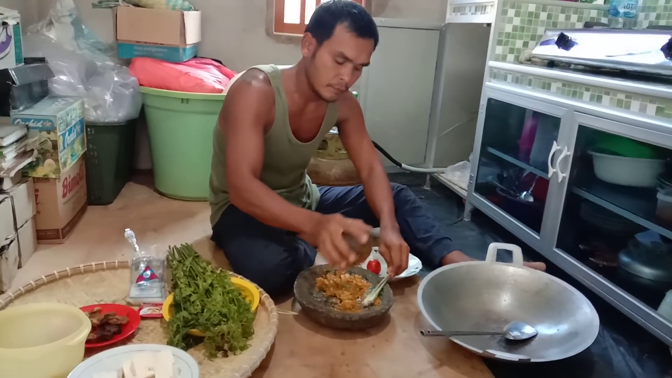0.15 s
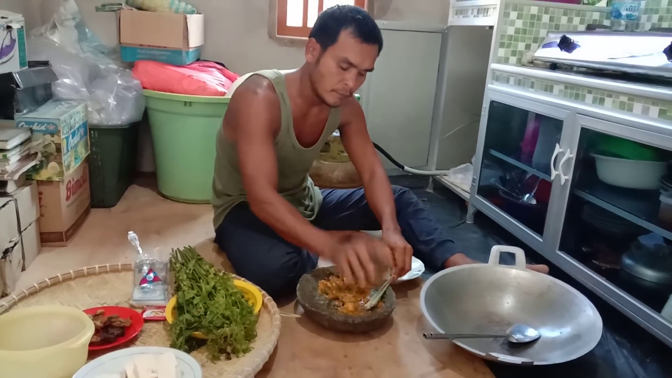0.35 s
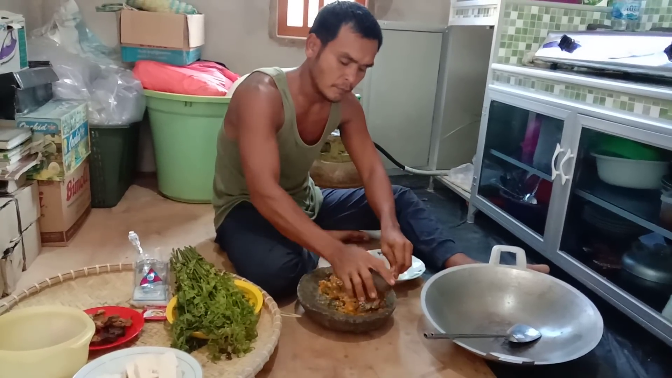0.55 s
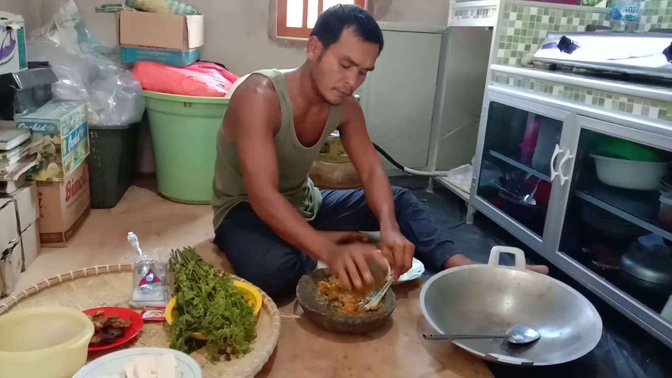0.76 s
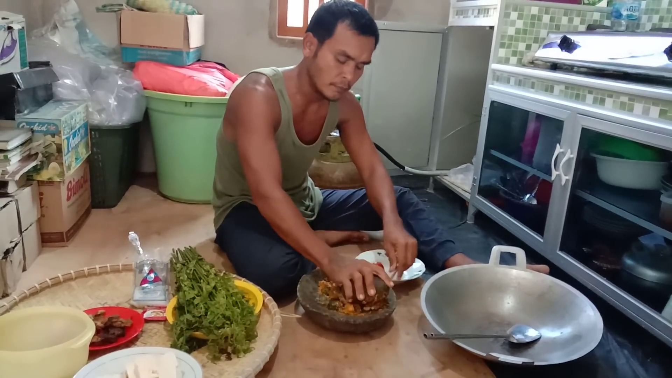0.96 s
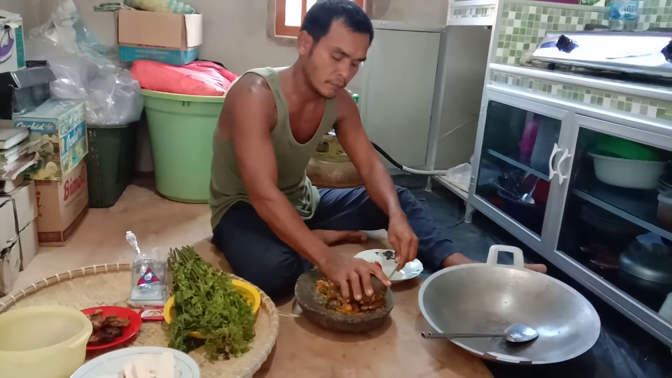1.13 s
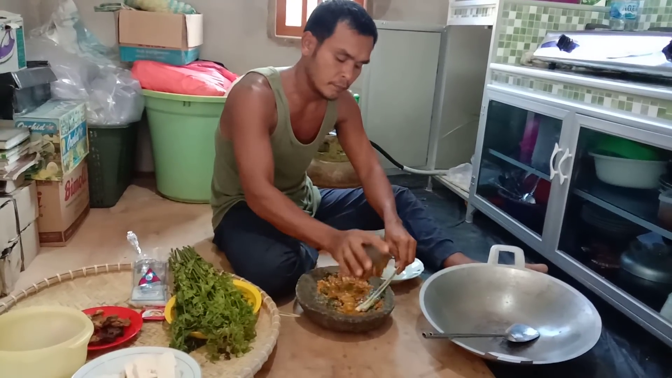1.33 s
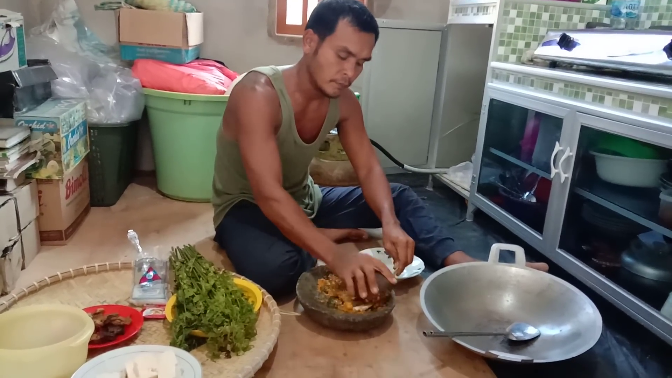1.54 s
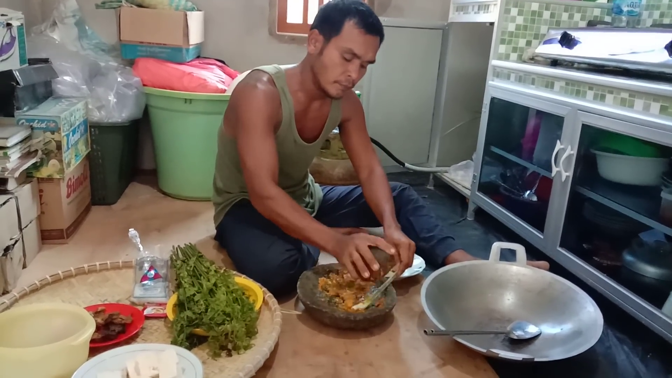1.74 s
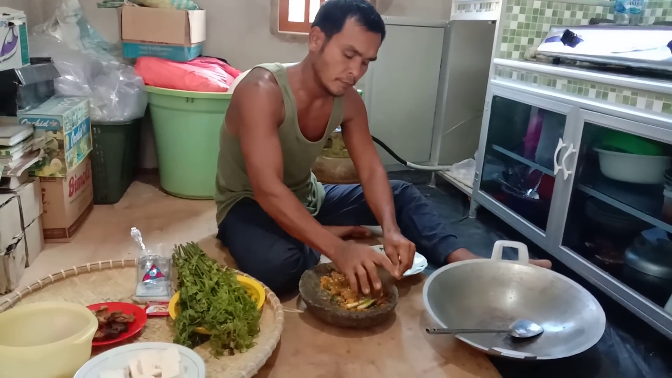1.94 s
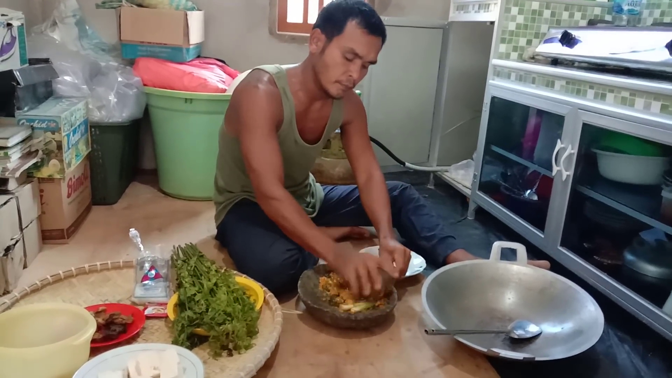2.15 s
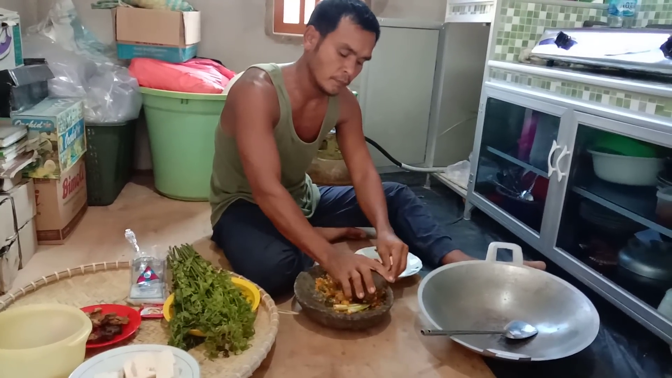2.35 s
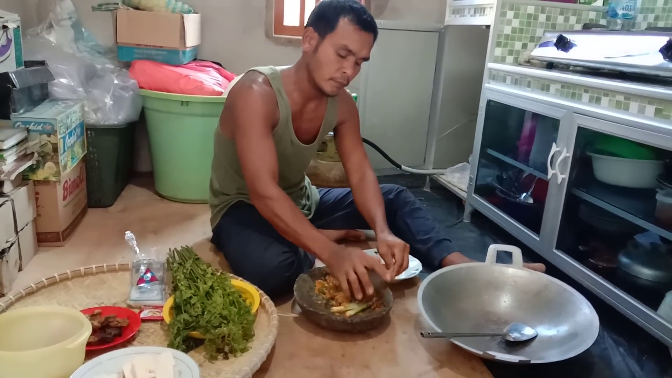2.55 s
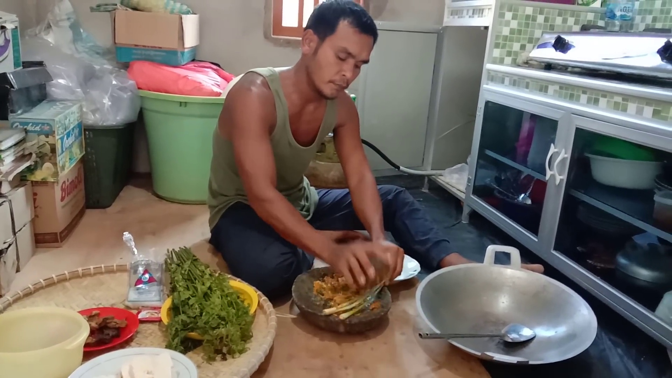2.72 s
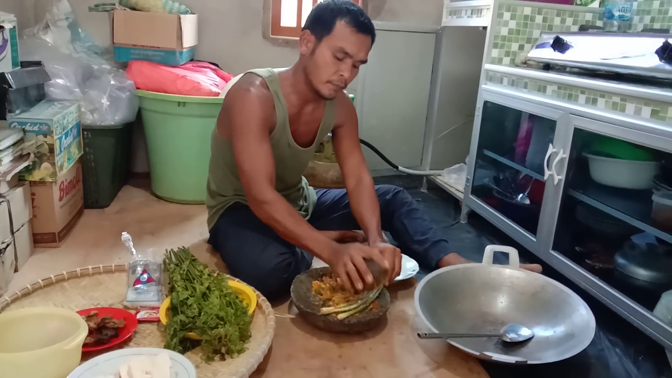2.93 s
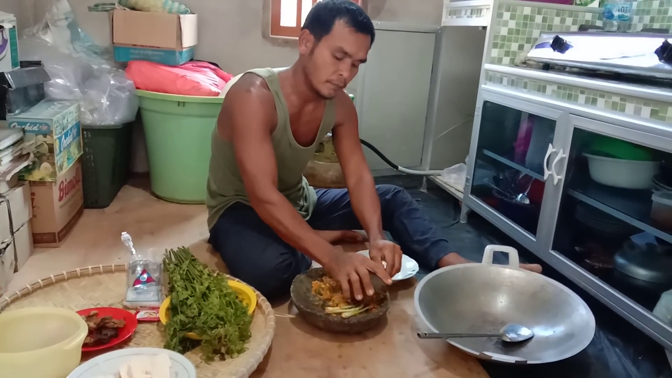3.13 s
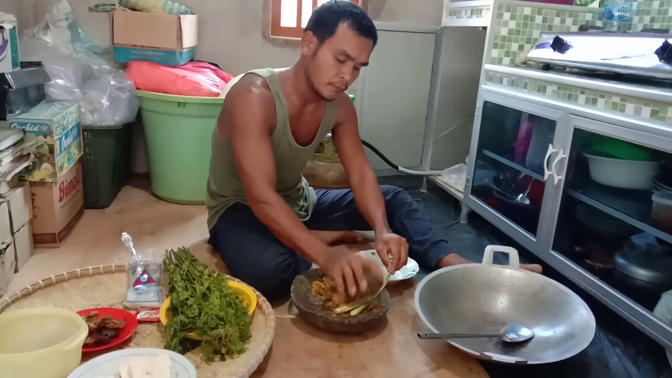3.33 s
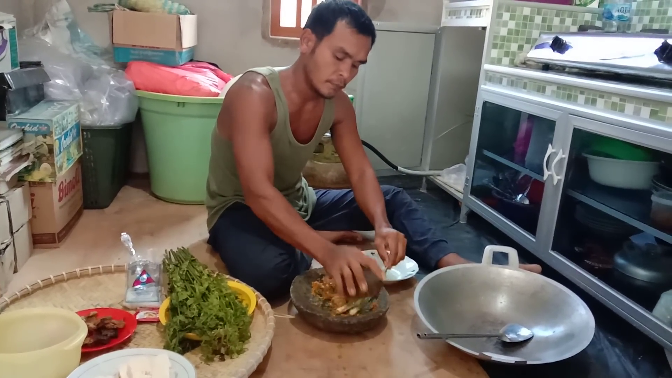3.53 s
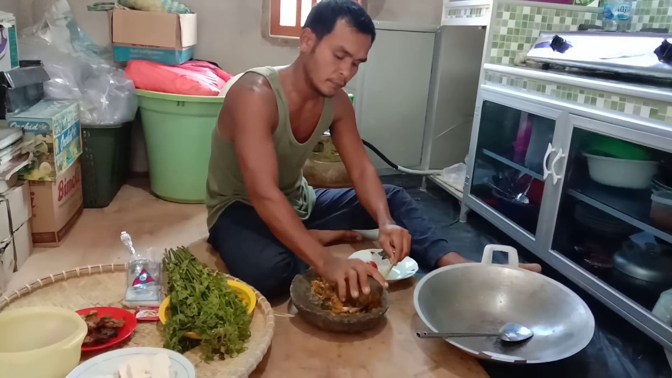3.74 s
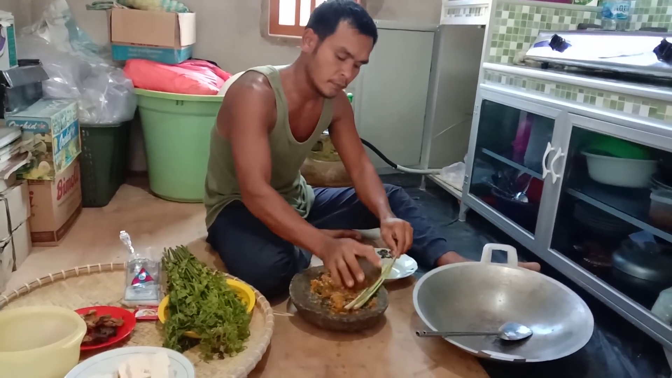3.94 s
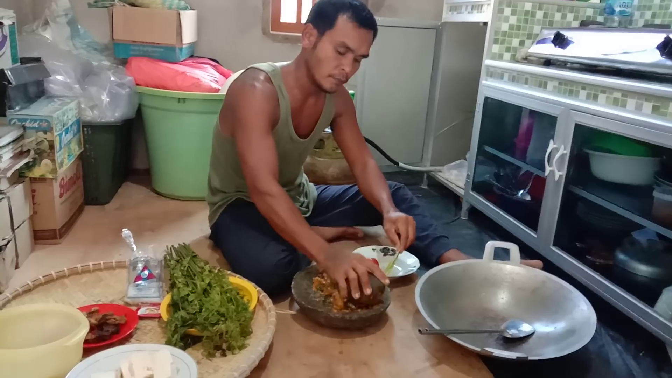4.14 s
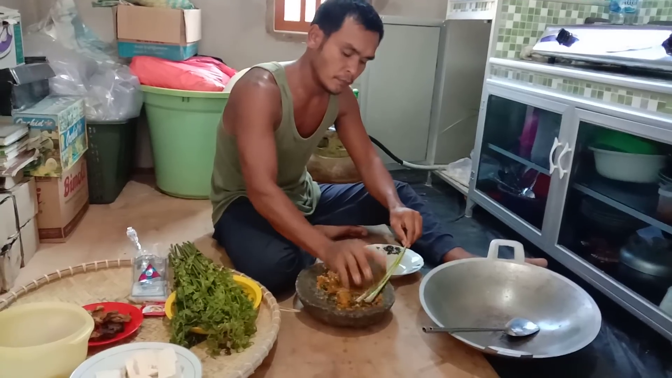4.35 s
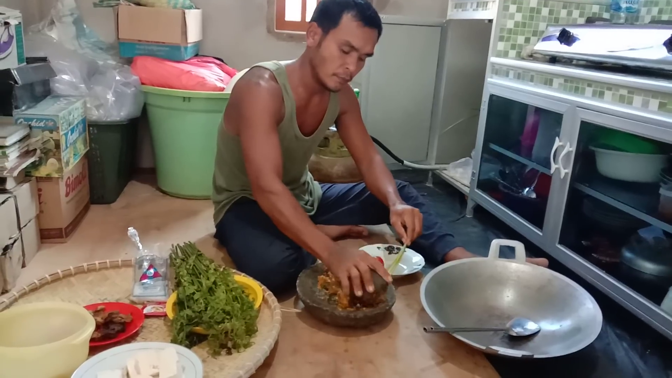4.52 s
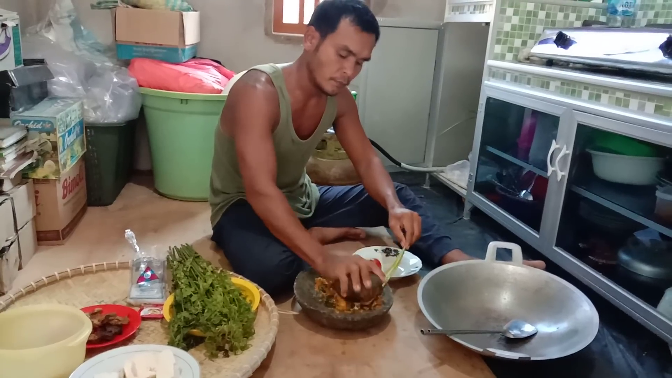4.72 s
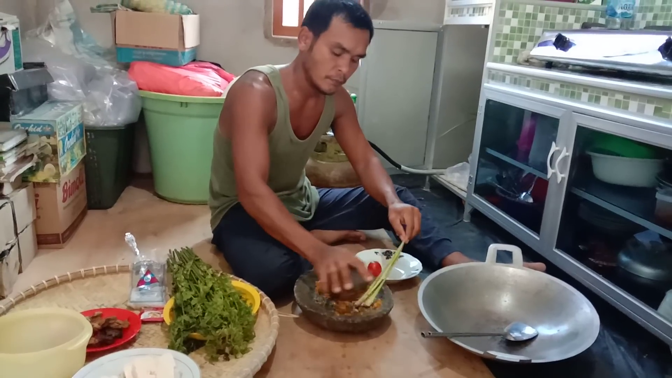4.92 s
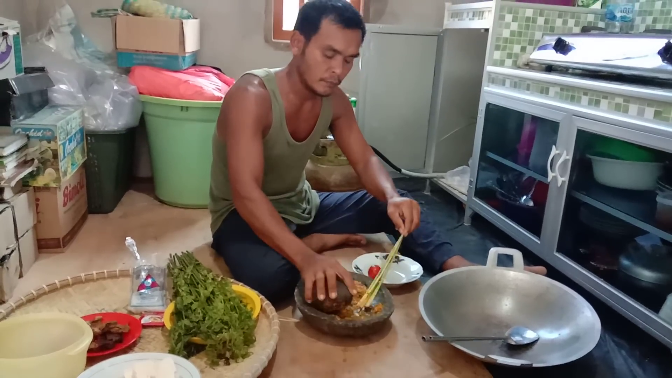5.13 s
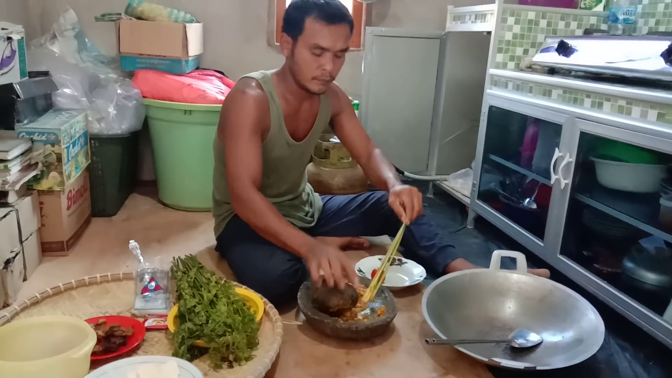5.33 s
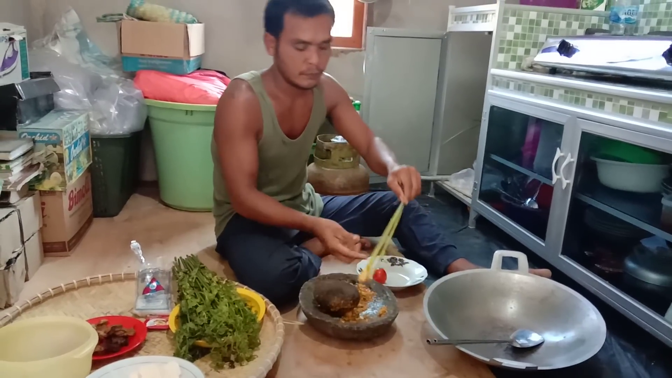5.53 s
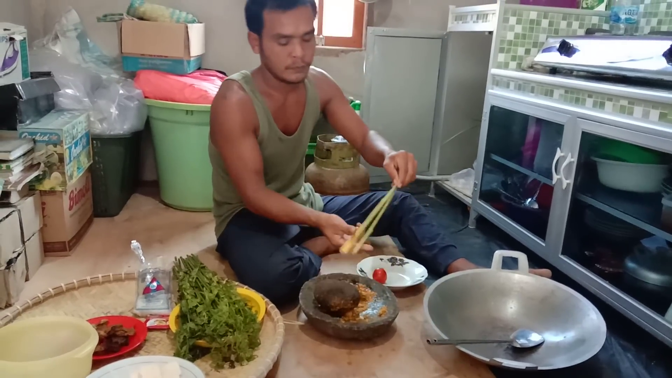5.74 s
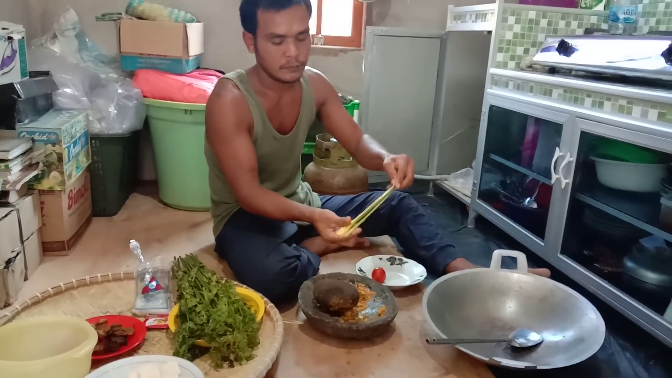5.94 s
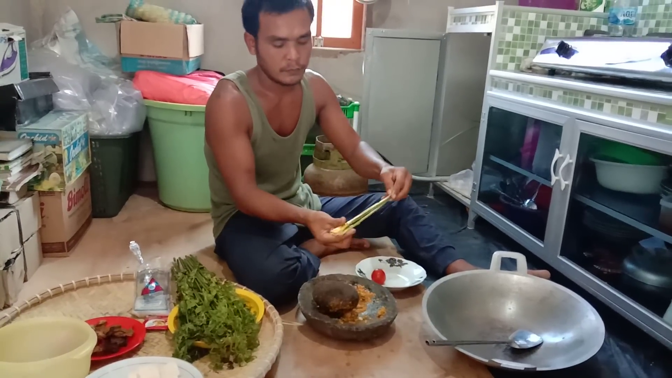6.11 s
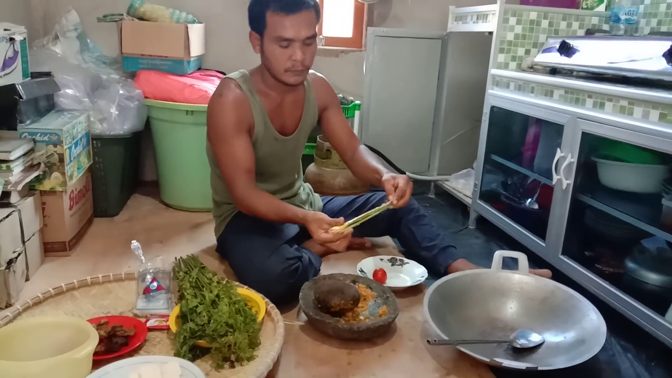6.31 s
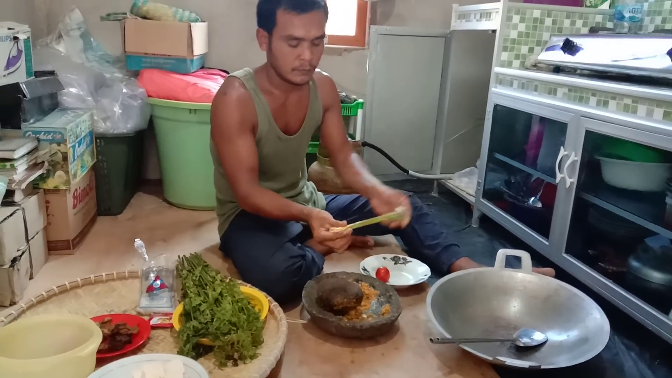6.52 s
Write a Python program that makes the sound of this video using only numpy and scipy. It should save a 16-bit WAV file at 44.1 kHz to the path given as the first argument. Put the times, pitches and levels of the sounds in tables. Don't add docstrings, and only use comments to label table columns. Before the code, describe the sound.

A faint ringing tail from an earlier blow fades at the start. At 0.37 s a stone pestle crunches into paste in a stone mortar, with a quick rebound, low floor thump and lively kitchen reverberation. Blows follow at 0.78, 1.43, 1.8, 2.13 and 2.74 s, with bounces, crackling stalks, tiny fibre snaps and shuffles; the last has sharp double rebounds and a wet hiss. At 3.04 s the pestle strikes bare stone, a hard ringing clack with diminishing chatter to 3.2. Steadier damped knocks land at 3.36, 3.69, 4.05, 4.39 and 4.71 s; a distant bird chirps near 4.25. At 5.06 s the pestle is laid down in a tight, hollow cluster of knocks. Quiet room tone remains, with a bright rustling tug around 5.7, faint bird chirps near 5.56 and 6.3, and a scratchy slide swelling at 6.67 s. Close phone microphone, loud hits compressed.

```python
import sys
import numpy as np
from scipy import signal
from scipy.fft import rfft, irfft
from scipy.io import wavfile
from scipy.ndimage import uniform_filter1d

SR = 44100
rng = np.random.default_rng(int(sys.argv[2]) if len(sys.argv) > 2 else 0)


def elevation(decibels):
    levels = np.asarray(decibels, float)
    return 10 ** (levels / 20)


def to_wav(s):
    ch = np.atleast_2d(s).T
    pcm = np.round(np.clip(ch, -1, 1) * 32767)
    wavfile.write(sys.argv[1], SR, pcm.astype(np.int16))


N = 294265


def at_hz(points, hz):
    table = np.array(points)
    return np.interp(np.log(hz + 1), np.log(table[:, 0]), table[:, 1])


def band(x, low_hz, high_hz, order=2):
    return signal.sosfilt(signal.butter(order, [low_hz, high_hz], "band", fs=SR, output="sos"), x)


def colour(x, points, peaks=()):
    hz = np.linspace(0, SR / 2, 4097)
    db = at_hz(points, hz)
    for f, width, top_db in peaks:
        db = db + top_db / (1 + (2 * (hz - f) / width) ** 2)
    cepstrum = irfft(db * np.log(10) / 20)
    cepstrum[1:4096] *= 2
    cepstrum[4097:] = 0
    return signal.oaconvolve(x, irfft(np.exp(rfft(cepstrum))))[:N]


def ring(x, hz, t60):
    r = elevation(-60 / (t60 * SR))
    w = 2 * np.pi * hz / SR
    return signal.lfilter([0, np.sin(w)], [1, -2 * r * np.cos(w), r * r], x + 1e-18)


def drift(rate):
    r = np.exp(-2 * np.pi * rate / SR)
    slow = signal.lfilter([1], [1, -2 * r, r * r], rng.standard_normal(N + SR))[SR:]
    return slow / slow.std()


COLOUR_HZ = (170, 520, 1300, 2700, 6000)


def tilt(row, hz, top_db):
    s, knock_db, thud, body, splash = row
    crack = -8 + 0.49 * splash
    levels = (thud, body, 0, crack, splash, splash + top_db)
    return knock_db + at_hz(list(zip(COLOUR_HZ + (14000,), levels)), hz)


def crush(rise_s, fall_s, lead_db):
    t = np.arange(-600, 1800) / SR
    shape = np.where(t > 0, (1 - np.exp(-t / rise_s)) * np.exp(-t / fall_s), 0)
    shape = shape / shape.max() + elevation(lead_db) * np.exp(-np.abs(t) / 0.014)
    roughness = elevation(0.59 * rng.standard_normal(len(t)))
    return shape * rng.standard_normal((2, len(t))) * roughness


def contacts(rows, rise_s, fall_s, lead_db, top_db):
    out = np.zeros(N + 2400)
    edges = 50 * 2.0 ** np.arange(0, 8.5, .7)
    grits = np.array([crush(rise_s, fall_s, lead_db) for row in rows])
    for k, (low, high) in enumerate(zip(edges, edges[1:])):
        hz = np.sqrt(low * high)
        direct_db = -1.1 * max(np.log2(hz / 1500), 0)
        for row, part in zip(rows, band(grits[:, k % 2], low, high)):
            i = round(row[0] * SR)
            level = elevation(tilt(row, hz, top_db) + direct_db)
            out[i:i + len(part)] += part / np.abs(part).max() * level
    return out[600:N + 600]


# (time [s], knock level [dB], thud, body and splash [dB against the knock])
BLOWS = [(0.3663, -12, -14.5, -3, 3), (0.778, -11.5, -17, -5, -4.5), (1.4304, -14, -13.5, -1.5, 2),
         (1.7955, -21.5, -14, 0.5, 10), (2.125, -26, -6, 3, 15), (2.7363, -24, -16.5, -3, 7.5),
         (3.3645, -15.5, -16, -9.5, -1.5), (3.6908, -13, -13, -7, -2.5), (4.0466, -16.5, -13.5, -7, -2.5),
         (4.3868, -15, -13, -7, -3), (4.7097, -17.5, -10.5, -4, -1)]


def push():
    push_s, push_db = 0.0022, -1.5
    out = np.zeros(N)
    shape = np.sin(2 * np.pi * np.arange(0, 1, 1 / (2 * push_s * SR)))
    for s, knock_db, thud, body, splash in BLOWS:
        i = round(s * SR)
        out[i:i + len(shape)] = elevation(knock_db + body + push_db) * shape
    return out


# (frequency [Hz], level [dB], t60 [s])
RINGS = [(92, -35.5, 0.94), (149.1, -20.5, 0.69), (222.2, -19, 0.35), (249.4, -18, 0.31),
         (307, -28.5, 0.24), (374.5, -16.5, 0.12), (558, -28.5, 0.27), (628, -24, 0.62), (842, -30, .3),
         (770, -32.5, 0.35), (1226, -33.5, 0.8), (1238, -35.5, 0.73)]


def rings(hits):
    return sum(elevation(db - 32.0) * ring(hits, hz, t60) for hz, db, t60 in RINGS)


# (delay [s], level [dB])
ECHOES = [(0.009, -24), (.027, -11)]


def echoes(x):
    return sum(elevation(db) * np.roll(x, round(lag_s * SR)) for lag_s, db in ECHOES)


# (frequency [Hz], t60 [s])
KITCHEN_T60 = [(70, 0.46), (200, 0.57), (600, 0.5), (1300, 0.46), (2700, 0.41), (6000, 0.36), (11000, 0.15),
               (15000, 0.23)]
# (frequency [Hz], level [dB])
KITCHEN = [(60, -8), (150, 6.5), (500, 1), (1300, -4.5), (2700, 0.5), (6000, -5.5), (11000, -2),
           (16000, 0.5)]


def kitchen(times, level_db, build_s, linger):
    white = rng.standard_normal((2, N))
    edges = 32 * 2.0 ** np.arange(0, 9.2, .5)
    out = np.zeros(N)
    quick = np.exp(-1 / (build_s * SR))
    patches = [elevation(2.0 * drift(16.0)) for k in range(3)]
    struck_at = np.round(np.array(times) * SR).astype(int)
    for k, (low, high) in enumerate(zip(edges, edges[1:])):
        hz = np.sqrt(low * high)
        struck = np.full(N, 1e-18)
        struck[struck_at] = elevation(2 * level_db(hz))
        near, far = np.roll(struck, round(0.011 * SR)), np.roll(struck, round(0.019 * SR))
        struck = 0.29 * struck + 0.2 * near + 0.35 * far
        slow = elevation(-120 / (linger * at_hz(KITCHEN_T60, hz) * SR))
        energy = signal.lfilter([1 - quick], np.convolve([1, -quick], [1, -slow]), struck)
        noise = band(white[k % 2], low, high)
        out += noise / noise.std() * np.sqrt(energy) * patches[k % 3] * elevation(at_hz(KITCHEN, hz))
    return out


# (frequency [Hz], level [dB])
MICROPHONE = [(30, -28), (70, -10), (1050, -0.5), (1250, 1), (1650, -0.5), (2200, -0.5), (2500, 2.5),
              (5800, -4), (6600, -3), (7200, 3.5), (8300, -9), (12800, -25), (15000, -3.5), (16000, -17.5)]


def microphone(x):
    return colour(x, MICROPHONE)


# (time [s], knock level [dB], thud, body and splash [dB against the knock])
BOUNCES = [(0.4261, -12, -34, -8.5, 0), (0.4675, -21.5, -23, -2, -22.5), (0.8298, -18.5, -16.5, -14, -4),
           (1.5116, -16, -32, -38, -32), (1.8393, -10.5, -14.5, -11, -7), (2.1756, -9, -19.5, -11.5, -18),
           (2.2117, -20.5, -13, -7, -14), (2.158, -27, -19, -10, -3), (1.463, -27, -19, -12.5, 0),
           (2.82, -17.5, -22, -9, -6.5), (3.2, -24, -17, -8.5, -19), (2.757, -14.5, -16, -11, -4),
           (2.786, -7.5, -16, -13.5, -7.5)]
# (time [s], knock level [dB], splash [dB against the knock])
TICKS = [
    (1.113, -64.5, 26.5),
    (1.118, -58, 25.5),
    (2.112, -68.5, 30),
    (2.5207, -63, 31.5),
    (2.558, -65, 33),
    (3.625, -77.5, 26),
]


def pounding():
    ticks = [(s, db, 0, 0, splash) for s, db, splash in TICKS]
    blows = contacts(BLOWS, 0.0035, .004, -34.5, -10.5)
    bounces = elevation(-5.5) * contacts(list(BOUNCES) + ticks, 0.0003, 0.005, -55.0, -1.1)
    rows = list(BLOWS) + list(BOUNCES) + ticks
    wet_db = np.repeat([-12, -19, -13], [len(BLOWS), len(BOUNCES), len(TICKS)])

    def room_level(hz):
        return np.array([tilt(r, hz, -7.0) for r in rows]) + wet_db

    room = kitchen([r[0] for r in rows], room_level, 0.002, 1.232)
    direct = blows + push() + bounces + rings(blows) + echoes(blows)
    return microphone(elevation(5.0) * direct + room)


# (start [s], level [dB])
CRACKLE = [(0.3634, -20), (0.773, -26), (1.422, -30), (1.795, -21), (2.1227, -26), (2.731, -35),
           (3.357, -35), (3.68, -35.5), (4.0383, -28.5), (4.38, -30.5), (4.7, -34)]
# (frequency [Hz], level [dB per Hz])
CRACKLE_COLOUR = [(800, -15.5), (2000, -0.5), (4000, -7.5), (6000, -1.5), (7300, 4.5), (8800, -15),
                  (12000, -26.5), (15000, -17)]


def crackle():
    grains = colour(rng.standard_normal(N) * elevation(2.0 * drift(400.0)), CRACKLE_COLOUR)
    level = np.zeros(N)
    for (start, db), blow in zip(CRACKLE, BLOWS):
        i, j = round(start * SR), round((blow[0] + 0.0025) * SR)
        level[i:j] = elevation(db + 8.0 * np.linspace(-1, .5, j - i))
    return uniform_filter1d(level, size=30) * grains / grains.std()


def stone_knock(rows, points, peaks, modes, rise_s, gain_db, room_db, echo_db, linger):
    hits = np.zeros(N)
    soft = signal.butter(2, 5000, fs=SR, output="sos")
    for k, (s, db) in enumerate(rows):
        i = round(s * SR) - 600
        grit = crush(rise_s, .003, -38)[0]
        if k:
            grit = signal.sosfilt(soft, grit)
        hits[i:i + 2400] += elevation(db) * grit
    bowl = sum(elevation(db) * ring(hits, hz, t60) for hz, db, t60 in modes)

    def room_level(hz):
        return np.array(rows)[:, 1] + room_db + 10 * np.log10(hz / SR)

    room = kitchen([r[0] for r in rows], room_level, 0.0028, linger)
    knock = colour(hits + elevation(echo_db) * echoes(hits) + room, points, peaks)
    return elevation(gain_db) * (knock + elevation(-16.5) * colour(bowl, points))


# (time [s], level [dB])
BARE = [
    (3.044, 5.5),
    (3.0724, -5),
    (3.1068, -17),
    (3.135, -16),
    (3.158, -11.5),
    (3.19, -10),
]
# (frequency [Hz], level [dB])
BARE_COLOUR = [(41, -49.5), (70, -29.5), (92, -10), (166, -35), (541, -21), (797, -12.5), (977, -14.5),
               (1250, -3), (1370, -8), (2430, -11), (3040, -16), (4000, -18.5), (7390, -21.5),
               (9490, -42.5), (13000, -54), (15000, -42), (16000, -48)]
# (frequency [Hz], width [Hz], level [dB])
BARE_PEAKS = [(807, 30, 2), (1170, 57, 4), (1265, 80, 2), (1294, 40, 1), (1590, 99, 6.5), (1907, 25, 0.5),
              (2050, 16.7, 5.5), (2400, 53, 10.5), (2760, 77, 9.5), (3220, 40, 5.5), (3990, 30, 7)]
# (frequency [Hz], level [dB], t60 [s])
BARE_MODES = [(815, -32.5, 0.44), (1170, -26.5, 0.19), (1220, -31, 0.43), (1265, -30.5, 0.39),
              (1570, -26, .3), (1925, -33.5, .6), (2010, -34, .6), (2385, -25, 0.52), (2440, -31, 0.35),
              (2717, -32.5, .5), (2804, -32, .5), (3187, -33, 0.68), (4026, -29.5, .45), (4200, -30, .25)]


def bare_blow():
    return stone_knock(BARE, BARE_COLOUR, BARE_PEAKS, BARE_MODES, 0.0009, 8.04, -8.0, -1.0, 1.426)


# (time [s], level [dB])
LAID = [
    (5.062, -9.5),
    (5.0648, -11),
    (5.07, -11),
    (5.0738, -16.5),
    (5.091, -13.5),
]
# (frequency [Hz], level [dB])
LAID_COLOUR = [(59, -25.5), (140, -23), (389, -26), (433, -29), (524, -16.5), (1060, -7), (1280, -2),
               (2690, -14.5), (2990, -20.5), (4020, -35.5), (4470, -28.5), (6560, -53.5), (7450, -41.5),
               (9410, -66), (16000, -62)]
# (frequency [Hz], width [Hz], level [dB])
LAID_PEAKS = [(1403, 77, 12), (1546, 160, 7), (1750, 85, 9), (2995, 74, 12.5), (4540, 220, 6),
              (5700, 66, -13)]
# (frequency [Hz], level [dB], t60 [s])
LAID_MODES = [(925, -24, .18), (1317, -26, 0.31), (1431, -33.5, 0.72), (1533, -40, .45), (1700, -39, .3),
              (1886, -38.5, 0.2), (2471, -33, 0.18), (2936, -29, 0.47), (4527, -35, 0.79)]


def pestle_laid_down():
    return stone_knock(LAID, LAID_COLOUR, LAID_PEAKS, LAID_MODES, 0.00067, 5.6, -13.5, -2.0, 1.28)


def rustle(level, points, grain_db, peaks=()):
    grains = colour(rng.standard_normal(N) * elevation(grain_db * drift(60.0)), points, peaks)
    return level * grains / grains.std()


# (time [s], level [dB])
RUMBLE = [(0.369, -33.5), (0.78, -39.5), (0.98, -42.5), (1.209, -49.5), (1.435, -35.5), (1.8, -35),
          (2.13, -38), (2.3, -42.5), (2.548, -52.5), (2.74, -37), (3.12, -41.5), (3.37, -37), (3.695, -36),
          (4.05, -35.5), (4.39, -36), (4.714, -38), (5.02, -43.5)]
# (frequency [Hz], level [dB per Hz])
RUMBLE_COLOUR = [(15, -50), (25, -32), (52, -5.5), (81, 5), (146, -5), (179, -17), (200, -16), (260, -36),
                 (440, -120)]
# (frequency [Hz], width [Hz], level [dB])
RUMBLE_PEAKS = [(70.5, 5.6, 1.5), (98.14, 3.7, 15)]


def shaking():
    rise_s, fall_s, lasts_s, before_s, still_s = .02, 0.53, 0.3, 0.048, 0.11
    t = np.arange(0, N + 32, 32) / SR
    level = 1e-9
    for (s, db), (next_s, next_db) in zip(RUMBLE, list(RUMBLE[1:]) + [(9, 0)]):
        ending = np.maximum(t - min(next_s - before_s, s + lasts_s), 0)
        fall_db = 20 * np.maximum(t - s, 0) / fall_s + 20 * ending / still_s
        level = level + (t > s) * elevation(db - fall_db)
    level = np.interp(np.arange(N) / SR, t, level)
    size = round(rise_s * SR)
    return uniform_filter1d(uniform_filter1d(level, size=size), size=size)


def floor():
    return rustle(shaking(), RUMBLE_COLOUR, 0.25, RUMBLE_PEAKS)


def swells(rows):
    t = np.arange(0, N + 32, 32) / SR
    level = 0
    for s, db, rise_s, fall_s in rows:
        rise_db = 20 * (np.maximum(s - t, 0) / rise_s) ** 2
        fall_db = 20 * np.maximum(t - s, 0) / fall_s
        level = level + elevation(db - rise_db - fall_db)
    return np.interp(np.arange(N) / SR, t, level)


# (peak time [s], peak level [dB], rise [s], fall [s])
FADING = [
    (0.0, -44, .01, 0.21),
]
# (frequency [Hz], level [dB per Hz])
FADING_COLOUR = [(71, -59), (120, -2), (199, -20.5), (266, -3), (417, -11), (491, -18.5), (705, -16.5),
                 (976, -16), (1430, -10.5), (2050, -15.5), (2500, -10.5), (4370, -27.5), (6620, -28),
                 (7380, -23), (9000, -40), (11700, -79.5), (19800, -120)]
# (frequency [Hz], width [Hz], level [dB])
FADING_PEAKS = [(720, 20, 20), (1460, 18.4, 18), (2590, 30, 10)]


def fading_pan():
    return rustle(swells(FADING), FADING_COLOUR, 0.6, FADING_PEAKS)


# (peak time [s], peak level [dB], rise [s], fall [s])
FIBRES = [
    (0.72, -51.5, 0.47, 0.078),
    (1.218, -55, 0.19, 0.18),
    (1.78, -44, 0.12, 0.11),
    (2.02, -50, 0.3, 0.33),
    (2.44, -54, 0.27, 0.22),
    (2.72, -46, 0.16, 0.059),
    (3.62, -50.5, 0.1, 0.36),
    (5.04, -56, 0.26, 0.035),
]
# (frequency [Hz], level [dB per Hz])
FIBRES_COLOUR = [(880, -24), (1500, 1), (1910, -10.5), (2040, -2.5), (2570, -3), (3160, -2.5), (3410, -4.5),
                 (4830, -5.5), (6070, -11), (6510, -43), (6800, -11), (8840, -26), (15000, -120)]


def fibres():
    return rustle(swells(FIBRES), FIBRES_COLOUR, 0.9)


# (peak time [s], peak level [dB], rise [s], fall [s])
SPRINKLE = [(1.116, -50.5, 0.0076, 0.017), (1.3, -63.5, 0.24, 0.2), (1.78, -51, 0.11, 0.033),
            (2.0, -63.5, .05, 0.25), (2.52, -67, 0.0056, 0.071), (2.36, -61.5, 0.061, 0.83),
            (2.72, -53.5, 0.11, 0.042), (3.52, -68.5, .05, 0.083), (5.066, -58.5, 0.026, 0.18),
            (5.774, -71, 0.069, 0.046), (6.385, -67.5, .1, 0.31), (6.66, -58.5, 0.13, .1)]
# (frequency [Hz], level [dB per Hz])
SPRINKLE_COLOUR = [(3880, -38), (6600, -3.5), (6900, -6), (7320, 9), (9600, -29), (10900, -23),
                   (11900, -24.5), (13400, -25), (14000, -29), (14900, -15), (16000, -30)]


def sprinkle():
    return rustle(swells(SPRINKLE), SPRINKLE_COLOUR, 1.6)


# (peak time [s], peak level [dB], rise [s], fall [s])
FIZZ = [
    (1.797, -63, .003, .06),
    (2.127, -60, .003, .06),
    (2.735, -50.5, .003, .14),
    (2.762, -55, .004, 0.12),
    (4.05, -56, 0.0032, .08),
]
# (frequency [Hz], level [dB per Hz])
FIZZ_COLOUR = [(7000, -29.5), (8800, 0), (11000, -5), (13500, -6), (16500, -8)]


def fizz():
    return rustle(swells(FIZZ), FIZZ_COLOUR, 2.0)


# (peak time [s], peak level [dB], rise [s], fall [s])
SHUFFLE = [
    (1.12, -56, 0.025, 0.034),
    (1.202, -53.5, 0.039, 0.25),
    (2.43, -58, 0.038, 0.088),
    (2.72, -60.5, 0.17, 0.028),
    (5.67, -76, .4, .02),
]
# (frequency [Hz], level [dB per Hz])
SHUFFLE_COLOUR = [(110, -25.5), (180, -1.5), (351, 1), (497, -5.5), (763, 1), (1080, -14), (1200, -9.5),
                  (1560, -39.5), (2640, -120)]


def shuffle():
    return rustle(swells(SHUFFLE), SHUFFLE_COLOUR, 1.5)


# (peak time [s], peak level [dB], rise [s], fall [s])
PULL_START = [
    (5.702, -54, 0.017, .1),
    (5.735, -60, 0.03, 0.12),
]
# (frequency [Hz], level [dB per Hz])
PULL_START_COLOUR = [(3600, -43), (4300, 7), (4900, 2), (5200, -8), (5700, -1), (6300, -41)]
# (peak time [s], peak level [dB], rise [s], fall [s])
PULL = [
    (5.7, -68, 0.019, 0.22),
    (5.76, -51, 0.084, .19),
]
# (frequency [Hz], level [dB per Hz])
PULL_COLOUR = [(1290, -61), (2200, -27.5), (2610, -27), (2680, -7), (3620, 2.5), (4150, 3), (4360, 3),
               (4500, -28), (5200, -8), (6760, -46), (11400, -120)]
# (frequency [Hz], width [Hz], level [dB])
PULL_PEAKS = [(2930, 90, 6), (3480, 90, 10), (4000, 80, 5), (4160, 80, 7)]


def pull():
    tug = rustle(swells(PULL_START), PULL_START_COLOUR, 2.2)
    return tug + rustle(swells(PULL), PULL_COLOUR, 1.7, PULL_PEAKS)


# (peak time [s], peak level [dB], rise [s], fall [s])
SLIDE = [
    (6.28, -66, 0.098, 0.24),
    (6.47, -64.5, 0.18, 0.041),
    (6.67, -47, 0.19, 0.091),
]
# (frequency [Hz], level [dB per Hz])
SLIDE_COLOUR = [(200, -62), (450, -4.5), (1050, -11.5), (1250, 0), (1550, 11), (1900, -5), (2600, 6),
                (3300, -3), (4500, 1.5), (6000, -10), (6800, -38)]
# (frequency [Hz], width [Hz], level [dB])
SLIDE_PEAKS = [(1250, 134, 12.5), (1487, 54, 7.5), (2530, 110, 6), (2888, 53, 11.5), (3630, 75, 16),
               (4320, 58, 6), (5060, 56, -3), (5900, 190, 12)]


def slide():
    return rustle(swells(SLIDE), SLIDE_COLOUR, 0.57, SLIDE_PEAKS)


# (time [s], level [dB], pitch [Hz])
CHIRPS = [
    (4.255, -62, 4940),
    (5.355, -75, 5020),
    (5.556, -68.5, 5060),
    (5.575, -70, 4580),
    (6.308, -66, 4980),
    (6.331, -64, 4570),
]


def bird():
    out = np.zeros(N)
    t = np.arange(5000) / SR
    shape = np.minimum(t / 0.0063, 1) * elevation(-60 * np.maximum(t - .04, 0) / 0.27)
    for s, db, hz in CHIRPS:
        note = band(rng.standard_normal(len(t)), hz - 70, hz + 70)
        i = round(s * SR)
        out[i:i + len(t)] += elevation(db) * note / note.std() * shape
    return out


# (frequency [Hz], level [dB per Hz])
HUSH = [(25, -3), (70, 9.5), (200, -12), (400, -17), (900, -22.5), (1400, -19.5), (2200, -24.5),
        (4300, -21), (7000, -27), (10000, -28), (16000, -32.5)]


def hush():
    peaks = [(1230, 45, 2.8), (1490, 55, 7.0), (2580, 110, 5.7), (4400, 200, 2.91)]   # Hz, width Hz, dB
    air = microphone(colour(rng.standard_normal(N), HUSH, peaks))
    held_db = -6.5 * (np.arange(N) / SR < 0.37)
    return elevation(-66.5 + held_db + 1.0 * drift(4.0)) * air / air.std()


# (frequency [Hz], level [dB per Hz])
HISS = [(2000, -18), (6600, -2), (9000, -2.5), (12500, 0.5), (16000, -1.5)]


def hiss():
    noise = colour(rng.standard_normal(N), HISS)
    return elevation(-85) * noise / noise.std()


def scene():
    stone = pounding() + crackle() + bare_blow() + pestle_laid_down() + floor()
    handling = fading_pan() + fibres() + sprinkle() + fizz() + shuffle() + pull() + slide()
    return (stone + handling + bird() + hush())[None]


def standing_waves():
    pitches, depths = rng.uniform(900, 9000, 90), 1.2 * rng.standard_normal(90)
    return [(hz, 45, db) for hz, db in zip(pitches, depths) if hz > 1700]


# (frequency [Hz], width [Hz], level [dB])
CASE = [(267, 180, 4.5), (396, 75, 4), (780, 150, 3.5), (1247, 67, 7), (1510, 35, 2), (2250, 140, -1.5),
        (2420, 120, 0.5), (3320, 97, 3.5), (4350, 52, -1.5), (5080, 170, 2.5), (5930, 200, 1.5),
        (6670, 250, -10), (11180, 870, 8.5)]


def phone_case(x):
    edge = [(20, -1.5), (15500, 0.5), (15900, -16.5), (17000, -36)]   # Hz, dB
    return colour(x, edge, CASE + standing_waves())


def band_limit(x):
    return signal.sosfilt(signal.butter(12, 16820, fs=SR, output="sos"), x)


def record(dry):
    heard = phone_case(dry[0]) + band(hiss(), 300, 15700, order=4)
    level_db = 10 * np.log10(uniform_filter1d(heard ** 2, size=220) + 1e-12)
    fall = 250 * np.arange(N) / SR
    held_db = np.maximum.accumulate(level_db + fall) - fall
    cut_db = uniform_filter1d(-.45 * np.maximum(held_db + 19.5, 0), size=130)
    gate_db = np.clip(0.44 * (uniform_filter1d(level_db, size=1800) + 63.5), -5, 0)
    mix = (heard * elevation(cut_db + gate_db - 1.0))[None]
    return band_limit(mix)


dry = scene()
out = record(dry)
to_wav(out)
```